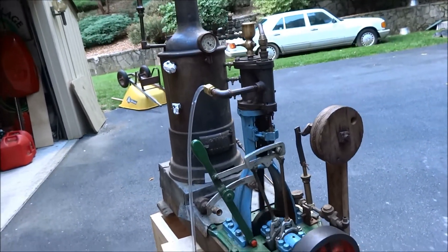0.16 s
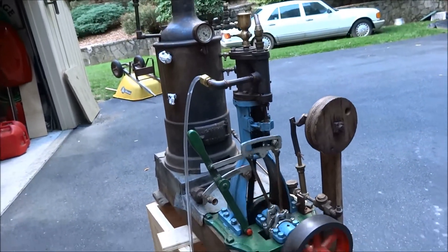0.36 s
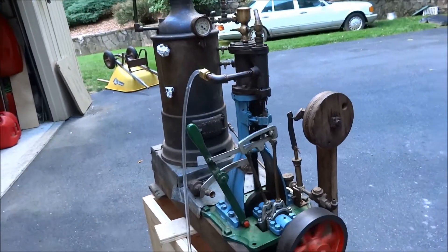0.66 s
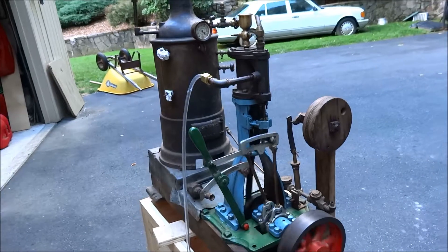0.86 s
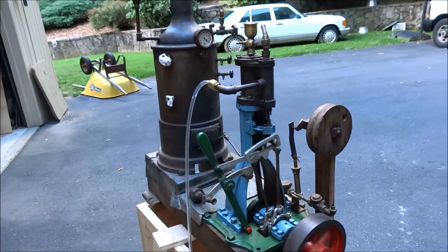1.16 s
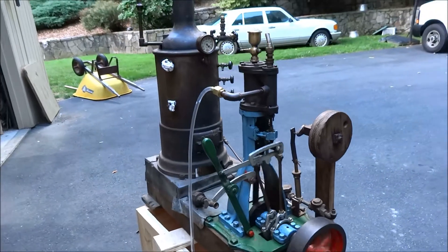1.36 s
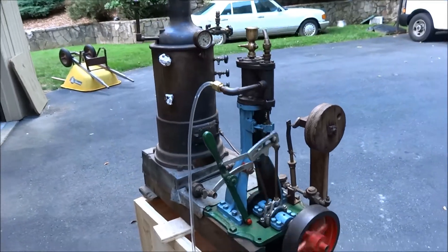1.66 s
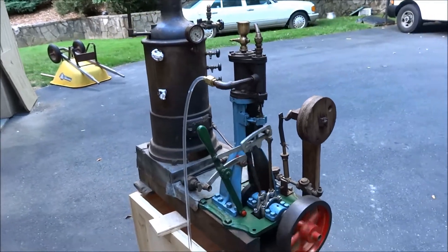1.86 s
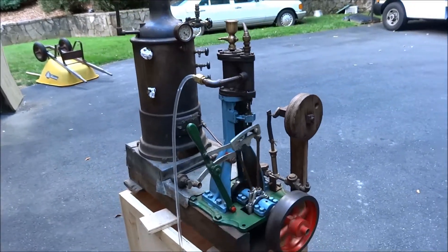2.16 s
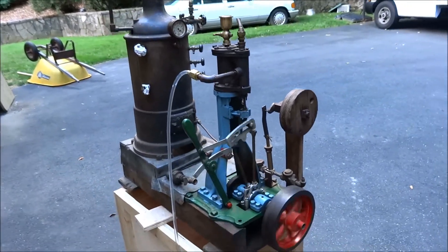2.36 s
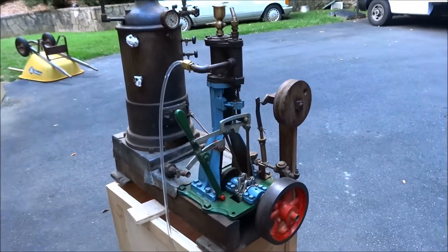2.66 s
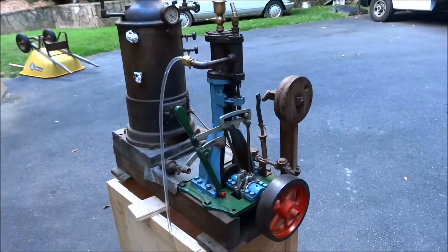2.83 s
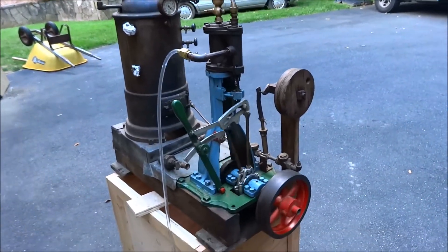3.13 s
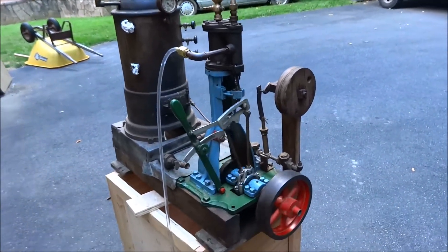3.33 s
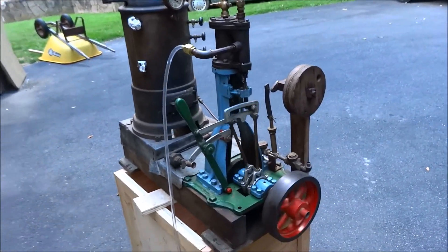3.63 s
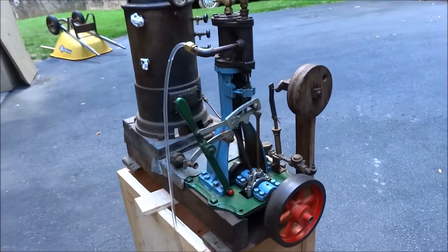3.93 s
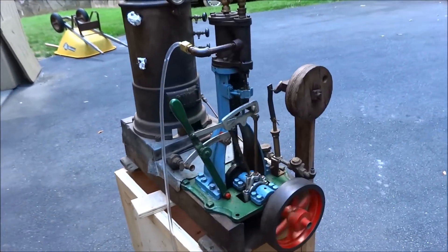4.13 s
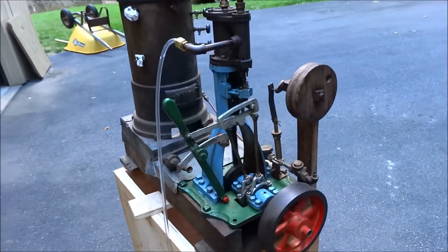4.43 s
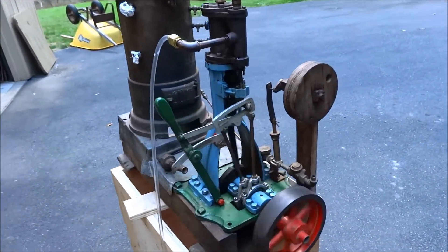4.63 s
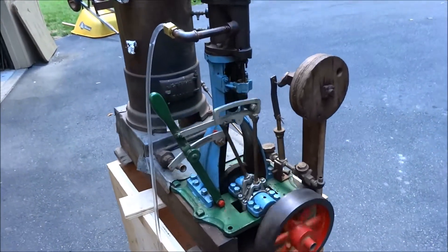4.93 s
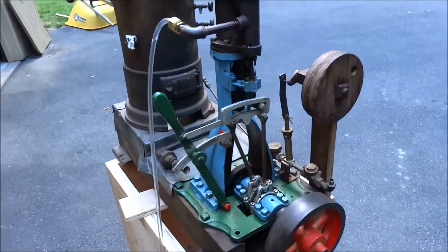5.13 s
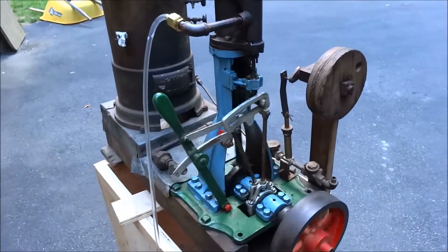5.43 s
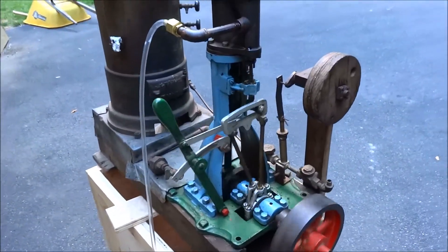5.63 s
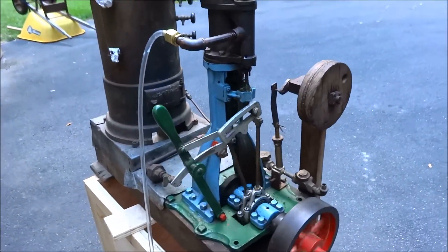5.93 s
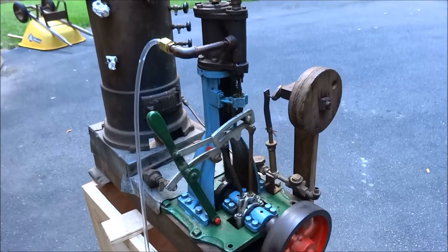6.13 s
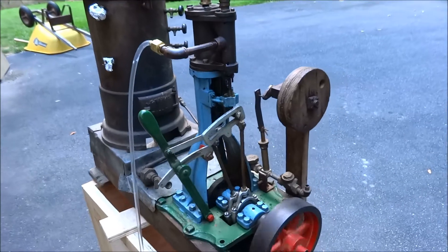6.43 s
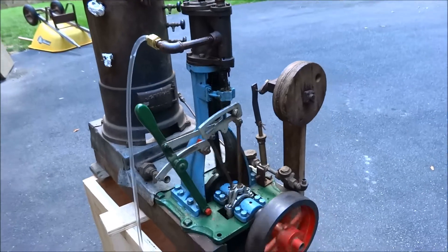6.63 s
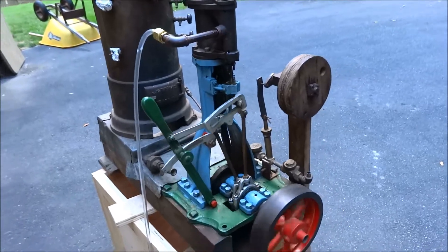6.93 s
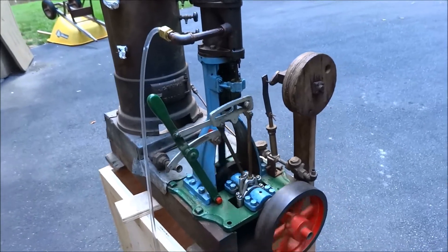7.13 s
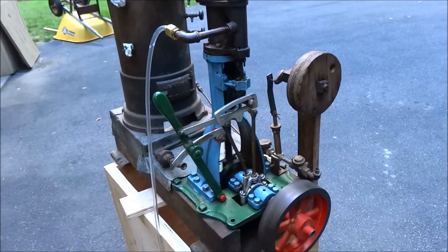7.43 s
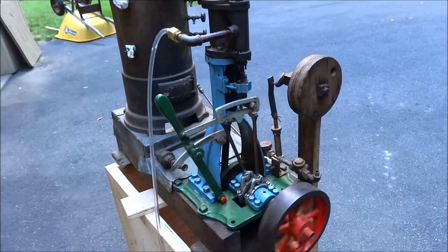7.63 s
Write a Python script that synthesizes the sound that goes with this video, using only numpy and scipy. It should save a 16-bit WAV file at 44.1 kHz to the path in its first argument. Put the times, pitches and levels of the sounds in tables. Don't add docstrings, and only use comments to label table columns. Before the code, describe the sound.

Rapid hissing, whistling exhaust puffs from a small compressed-air engine close by, with light wooden knocks and clatter, gradually slowing outdoors.

```python
import sys
import numpy as np
from scipy import signal
from scipy.fft import rfft, irfft, next_fast_len
from scipy.io import wavfile
from scipy.ndimage import uniform_filter1d

SR = 44100
rng = np.random.default_rng(int(sys.argv[2]) if len(sys.argv) > 2 else 0)


def magnitude_from_level(level_db):
    exponent = np.asarray(level_db, float) / 20
    return 10 ** exponent


def store_wav(level_fs):
    pcm = np.round(np.clip(np.atleast_2d(level_fs), -1, 1) * 32767)
    wavfile.write(sys.argv[1], SR, pcm.T.astype(np.int16))


N = 343098

# (time [s], low modes [dB], middle modes [dB], high modes [dB], hiss brightness [dB])
APPROACH = [(0, -43, -33.5, -25.5, -22), (2.5, -43.5, -32, -25.5, -23), (5, -38, -30, -24.5, -25),
            (7.8, -36.5, -28.5, -26, -28)]
# (time [s], valve progress at which the jet drops out of its fast regime [1])
PRESSURE = [
    (0, 0.66),
    (2, 0.5),
    (3.5, 0.29),
    (5, 0.29),
    (7.8, 0.03),
]


def evened(x):
    return x / np.sqrt(np.mean(x ** 2) + 1e-20)


def follow(course, x, column=1):
    rows = np.transpose(course)
    return np.interp(x, rows[0], rows[column])


def read(points, hz):
    f, value = np.transpose(points)
    return np.interp(np.log(hz + 1), np.log(f + 1), value)


def coloured_noise(points):
    size = next_fast_len(N)
    gain = magnitude_from_level(read(points, np.fft.rfftfreq(size, 1 / SR)))
    return evened(irfft(rfft(rng.standard_normal(N), size) * gain, size)[:N])


def drift(seconds):
    size = max(int(seconds * SR), 1)
    return evened(uniform_filter1d(uniform_filter1d(rng.standard_normal(N), size), size))


def pressure_sag(s):
    return PRESSURE[0][1] - follow(PRESSURE, s)


def turn_times():
    # (turns since the first upstroke [1], time [s])
    flywheel = [(0, -.043), (3, .466), (6, .977), (9, 1.495), (12, 2.019), (15, 2.559), (18, 3.129),
                (21, 3.732), (24, 4.366), (27, 5.007), (30, 5.668), (33, 6.375), (35, 6.886), (36, 7.153),
                (37, 7.433), (38, 7.734), (39, 8.059)]
    turns, s = np.transpose(flywheel)
    k, slope = np.arange(turns[-1] + 1), np.gradient(s, turns, edge_order=2)
    i = np.minimum(np.searchsorted(turns, k, "right"), len(s) - 1) - 1
    span = turns[i + 1] - turns[i]
    u, step = (k - turns[i]) / span, s[i + 1] - s[i]
    a, b = slope[i] * span, slope[i + 1] * span
    return s[i] + u * a + u ** 2 * (3 * step - 2 * a - b) + u ** 3 * (a + b - 2 * step)


def strokes():
    # (time [s], downstroke opens after [turn], upstroke open for [turn], downstroke open for [turn])
    timing = [(0, 0.52, 0.37, .27), (2, 0.52, 0.36, .272), (3.5, 0.52, 0.36, 0.29), (4.7, 0.52, 0.38, 0.31),
              (6, 0.52, 0.37, 0.32), (6.8, 0.53, 0.37, 0.32), (7.8, 0.52, 0.34, 0.32)]
    # (time [s], flow [dB], grip of the jet on the 7 kHz mode [dB])
    jet = [(0, -0.5, -0.5), (.9, -0.5, 0), (1.8, -1.7, -0.5), (3, -0.6, 1.5), (3.4, 2, 2.5), (4.3, .3, 3.5),
           (5.3, 1, 6.5), (6.3, 0.3, 4), (7.8, 2, 0.5)]
    # (hiss [dB], 5 kHz whistle [dB], 7 kHz whistle [dB], afterblow [dB])
    stroke_db = [
        (-23, -33, -23.5, 0.4),
        (-20, -32.5, -24.5, -4.5),
    ]
    # (hiss [dB], 5 kHz [dB], 7 kHz [dB], afterblow [dB])
    sag_rise_db = [
        (3.5, 21.5, 0.1, 0.1),
        (-1, 14.5, 0.1, 10),
    ]
    # (hiss [dB], 5 kHz [dB], 7 kHz [dB], afterblow [dB])
    chance_db = (.5, 1, 1, 1.2)
    # (time [s], afterblow change [dB])
    seatings = [
        (7.3, -9),
        (7.59, -5),
        (1.8, -6),
        (1.24, 6),
        (5.34, 3),
    ]
    up = turn_times()
    period, up = np.diff(up), up[:-1]
    delay, open_up, open_down = (follow(timing, up, column) * period for column in (1, 2, 3))
    opens = np.ravel([up, up + delay], "F")
    span = np.ravel([open_up, open_down], "F")
    down, sag = np.arange(len(opens)) % 2, pressure_sag(opens)
    db = np.array(stroke_db)[down] + np.array(sag_rise_db)[down] * sag[:, None]
    db[:, 0] += follow(jet, opens, 1)
    db[:, 2] += follow(jet, opens, 2)
    db += chance_db * rng.standard_normal(db.shape)
    for s, change_db in seatings:
        db[np.argmin(abs(opens - s)), -1] += change_db
    return np.column_stack([opens, span, db])[opens < N / SR]


def crank(puffs):
    t, (opens, span) = np.arange(N) / SR, puffs.T[:2]
    stroke = np.clip(np.searchsorted(opens, t) - 1, 0, len(opens) - 1)
    rest = np.maximum(np.append(np.diff(opens), 2 * span[-1]) - span, 1e-3)
    since = t - opens[stroke]
    shut = 1 + (since - span[stroke]) / rest[stroke]
    return stroke, np.where(since < span[stroke], since / span[stroke], shut)


def valve_db(puffs, stroke, progress, column):
    # (progress [1], hiss up [dB], hiss down [dB], whistle up [dB], whistle down [dB])
    valve = [
        (0, -1.5, 0.5, 8, 5),
        (.05, 4.5, 1.5, 1, 10),
        (.14, 3.5, 4, -1, 5),
        (.6, 3, 1, -1, 1.5),
        (.97, -3, -9.5, 0, 0),
        (1.07, -9, -15, -3.5, -7.5),
        (1.38, -10.5, -25, -1, -2.5),
        (1.5, -20, -24.5, -7, -4.5),
        (2, -7.5, -24, 0.5, -14.5),
    ]
    # (progress [1], change as pressure sags by 1 [dB])
    seep = [
        (1, 1.5),
        (1.22, -9),
        (1.5, 9),
        (2, -0.5),
    ]
    up, down = follow(valve, progress, column), follow(valve, progress, column + 1)
    shut_steps = np.transpose(valve)[0][4:8]
    afterblow = np.interp(progress, shut_steps, [0, 1, 1, 0]) * puffs[stroke, 5]
    up = up + pressure_sag(puffs[stroke, 0]) * follow(seep, progress)
    return np.where(stroke % 2, down, up) + afterblow


def hiss(puffs, stroke, progress):
    # (frequency [Hz], level per Hz [dB])
    jet_colour = [(700, -30), (1300, -37), (2300, -9.5), (4000, -10.5), (6000, -3.5), (8000, 0),
                  (10500, 5.5), (12500, 4), (15000, -4), (16000, -9)]
    sweep_db, patchy_db, gusty_db = 11, 2.0, 0.6
    frames, hz = N // 64 + 5, np.fft.rfftfreq(256, 1 / SR)
    at = np.minimum(np.arange(frames) * 64, N - 1)
    bright_db = follow(APPROACH, at / SR, 4) + 21
    tilt_db = 1.58 * bright_db + sweep_db * (.55 - np.minimum(progress[at], 1.1))
    tilt_db -= 0.37 * bright_db * np.exp(-progress[at] / 0.12)
    a, b, patches = rng.standard_normal((frames, 129, 3)).T
    patches = evened(uniform_filter1d(uniform_filter1d(patches, size=4, axis=0), size=6, axis=1))
    octaves = np.clip(np.log2((hz + 1) / 8500), -.8, 1)
    field_db = read(jet_colour, hz)[:, None] + octaves[:, None] * tilt_db + patchy_db * patches
    noise = signal.istft((a + 1j * b) * magnitude_from_level(field_db), nperseg=256, noverlap=192)[1][:N]
    level_db = puffs[stroke, 2] + valve_db(puffs, stroke, progress, column=1) + gusty_db * drift(0.0055)
    level_db += 11.0 * (follow(PRESSURE, np.arange(N) / SR) - .45)
    return evened(noise) * uniform_filter1d(magnitude_from_level(level_db + 5.5), size=40)


def resonate(x, hz, width):
    turn = np.exp(2j * np.pi * np.cumsum(hz) / SR)
    r = np.exp(-1.5 * np.pi * width / SR)
    return 2.224 * (turn * signal.lfilter([(1 - r) ** 2], [1, -2 * r, r * r], x / turn)).real


def whistles(puffs, stroke, progress):
    # (frequency [Hz], width [Hz], level [dB], jet excess of best locking [1],
    # reach above [1], reach below [1], locking depth [dB], upward pull [1])
    passage = [(1025, 133, -13, -0.92, .5, 0.51, -3, 0.074),
               (1710, 326, -0.5, 0.21, 0.97, 1.1, -3.5, -0.097), (2990, 270, 3, -0.72, 0.63, 2.2, 7, 0.071),
               (4206, 200, -8, -0.33, 0.83, 0.46, 7.5, 0.12), (4985, 207, .5, -0.4, 0.43, 0.6, 11.5, 0.04),
               (6826, 225, -1, -0.14, 0.31, 0.51, 15.5, 0.202), (8990, 330, 4, 0.18, 0.4, 0.32, 23, 0.19),
               (9560, 180, 3.5, -0.064, 0.097, 0.85, 5.5, -0.123),
               (10770, 300, 6, 0.345, 0.12, 0.078, 29, 0.27),
               (11364, 180, 1, -0.064, 0.17, 0.59, 4.5, 0.0018),
               (11470, 760, 0.5, 0.14, 0.88, .15, 21, 0.59), (13870, 580, 0, 0.046, 0.47, 0.45, 9, 0.21)]
    flicker_db, wander = 1.5, 0.0092
    t = np.arange(N) / SR
    excess = follow(PRESSURE, t) - progress
    low, mid, high = (follow(APPROACH, t, column) for column in (1, 2, 3))
    base_db = [low, low, mid, mid, puffs[stroke, 3], puffs[stroke, 4]] + [high] * 6
    whistle_flow_db = valve_db(puffs, stroke, progress, column=3)
    hiss_flow_db = valve_db(puffs, stroke, progress, column=1)
    is_open, out = progress < 1, np.zeros(N)
    flicker = [drift(0.0084), drift(0.018)]
    for k, (hz, width, db, best, above, below, depth_db, pull) in enumerate(passage):
        off = excess - best
        lock = magnitude_from_level(depth_db * (np.exp(-(off / np.where(off > 0, above, below)) ** 2) - 1))
        if k in (4, 5):
            power = np.bincount(stroke, lock ** 2 * is_open) / np.bincount(stroke, is_open)
            lock /= np.sqrt(power)[stroke]
        loud, bend = (np.roll(f, rng.integers(N)) for f in flicker)
        flow_db = hiss_flow_db if hz > 7500 else whistle_flow_db
        ring_on = min(0.87 + hz / 11000, 1)
        drive = magnitude_from_level(base_db[k] + db + ring_on * flow_db + flicker_db * loud) * lock
        pitch = hz * (1 + pull * np.clip(off, 0, .5) + wander * bend)
        gain = np.sqrt(SR / (np.pi * width))
        out += gain * resonate(drive * rng.standard_normal(N), pitch, width)
    return out


def each_turn(course, opens):
    at = opens + follow(course, opens, 1)
    db = follow(course, opens, 2) + 1.2 * rng.standard_normal(len(at))
    return np.column_stack([at, db])[(at > 0) & (at < N / SR)]


def bursts(rows, spread, colour):
    t, gain = np.arange(N) / SR, np.zeros(N)
    for s, db in rows:
        near = slice(max(round((s - 4 * spread) * SR), 0), round((s + 4 * spread) * SR))
        gain[near] += magnitude_from_level(db) * np.exp(-((t[near] - s) / spread) ** 2)
    return gain * coloured_noise(colour)


def slaps(puffs):
    # (time [s], level [dB])
    face_slaps = [(0.592, -8.8), (1.564, -16.0), (1.734, -18.1), (1.91, -17.1), (2.823, -16.8),
                  (3.01, -20.2), (3.204, -17.4), (5.181, -17.4), (5.849, -14.2), (6.082, -14.4),
                  (7.378, -10.2), (7.675, -9.8)]
    # (time [s], lag after the valve opens [s], level [dB])
    pops = [(0, -0.0051, -41), (3, 0.0045, -33), (5, -0.0018, -27.5), (7.8, -0.000036, -25)]
    # (time [s], lag after the valve opens [s], level [dB])
    spits = [(0, -0.018, -48), (2.5, -0.014, -38), (5, -0.014, -21), (6.9, -0.0184, -21), (7.3, -.022, -42)]
    # (frequency [Hz], level per Hz [dB])
    pop_colour = [(400, -30), (800, -6.5), (1700, -3), (3000, -2.5), (8000, -20)]
    # (frequency [Hz], level per Hz [dB])
    spit_colour = [(1800, -18), (2600, -11), (3030, -10), (3600, -24), (4500, -22), (5000, 3), (5600, -13),
                   (9600, -22)]
    out = bursts(face_slaps, 0.0025, [(2500, -18), (6000, 2), (11000, 3), (16000, -12)])
    out += bursts(each_turn(pops, puffs[:, 0]), 0.0023, pop_colour)
    return out + bursts(each_turn(spits, puffs[::2, 0]), 0.0035, spit_colour)


def blows(rows, hz, rise, fall, db, scatter=0., glide=0., overtones=()):
    out, t = np.zeros(N + SR), np.arange(5000) / SR
    detunes = rng.uniform(-1.3, 1, len(rows))
    for (s, peak_db), detune in zip(rows, detunes):
        swell = np.sin(np.pi / 2 * np.minimum(t / rise, 1))
        swell *= np.exp(-(np.maximum(t - rise, 0) / fall) ** 2)
        ring = swell * np.sin(2 * np.pi * hz * t * (1 + scatter * detune + glide * t))
        for h, d, f in overtones:
            ring += magnitude_from_level(d) * np.exp(-t / f) * np.sin(2 * np.pi * h * (1 + 0.1 * detune) * t)
        start = max(round((s - rise) * SR), 0)
        out[start:start + len(t)] += magnitude_from_level(peak_db + db) * ring
    return out[:N]


def clatter(puffs):
    # (time [s], lag after the valve opens [s], level [dB]) Crank load on the stand, and the stand
    thump_course = [(0, 0.044, -36), (1.8, .044, -36), (2.1, 0.0368, -33.5), (2.8, 0.036, -31),
                    (3, 0.042, -31), (4, .043, -34.5), (5.1, .049, -34.5), (6, 0.042, -37.5),
                    (7.2, 0.049, -43)]
    settle_course = [(0, 0.079, -60), (3, 0.093, -49), (4.5, 0.104, -41), (5.5, .108, -43),
                     (6.2, 0.108, -50), (7.8, .12, -56)]
    knock_up = [(0, -0.0045, -34.5), (2.4, -0.0036, -32), (3.3, -.005, -30.5), (3.7, -0.0043, -35),
                (4.4, -.012, -36.5), (4.8, -0.01, -31.5), (5.9, -.011, -26.5), (6.9, -0.0075, -28.5),
                (7.8, -.01, -35)]
    knock_down = [(0, -0.018, -32.5), (.8, -0.013, -30), (1.3, -0.0098, -35.5), (3.4, -.015, -36),
                  (4.2, -0.018, -40), (4.7, -.017, -32), (5.5, -.019, -33), (6, -0.008, -27.5),
                  (7.8, -0.031, -29.5)]
    chirp_course = [(.46, 0.00068, -39), (.6, -.03, -43), (1.7, -0.025, -36.5), (2.9, -.034, -32.5),
                    (3.7, -.026, -33.5), (4.2, -.035, -36), (4.8, -.04, -36), (7.1, -0.036, -36),
                    (7.4, -0.083, -38)]
    rub_course = [(0, -0.066, -51), (2, -0.069, -39), (4, -.062, -37), (7.8, -.08, -45)]
    rock_back = [(0, -.015, -38), (1.7, -.011, -39), (2.2, -.006, -38.5), (3.5, -0.011, -38),
                 (3.7, -0.03, -35), (5.6, -0.0328, -45), (5.9, -.018, -39), (7.15, -0.018, -31),
                 (7.4, -0.054, -26.5)]
    rock_forward = [(0, -.014, -48), (3, -0.0173, -41), (7.8, -.022, -46)]
    up, down = puffs[::2, 0], puffs[1::2, 0]
    thumps = blows(each_turn(thump_course, up), 91.6, 0.018, 0.034, 4.4, scatter=0.018,
                   overtones=[(288.6, -6.5, 0.026), (175, -6.5, 0.017)])
    thumps += blows(each_turn(settle_course, up), 90.3, 0.0302, 0.042, 2.7)
    ends = np.vstack([each_turn(knock_up, up), each_turn(knock_down, down)])
    knocks = blows(ends, 310.4, 0.00692, 0.0084, 0.3, scatter=0.063,
                   overtones=[(382, -2.5, 0.0086), (236, -6, 0.017)])
    rubs = np.vstack([each_turn(chirp_course, up), each_turn(rub_course, up)])
    chirps = blows(rubs, 763, .012, 0.017, -3.0, scatter=0.031, glide=3.44)
    chirps *= 1 + 0.5 * drift(0.0026)
    rocks = np.vstack([each_turn(rock_back, up), each_turn(rock_forward, down)])
    return thumps + knocks + chirps + blows(rocks, 154.5, 0.01016, 0.0094, 1.4, scatter=0.088)


def yard(stroke, progress):
    # (frequency [Hz], level per Hz [dB])
    leak_colour = [(1300, -4.5), (2500, 0), (5000, -7.5), (8000, 5), (14300, 2), (15700, -5), (16200, -13)]
    # (frequency [Hz], level per Hz [dB])
    rumble_colour = [(15, -50), (25, -9), (87, -3.5), (113, -0.5), (224, -6), (300, 0), (519, -10),
                     (730, -5), (1140, -12.5), (1500, -14), (1950, -31), (3300, -120)]
    # (time [s], level [dB])
    rumble_course = [(0, -42.5), (2.5, -40.5), (5, -39), (7.8, -38)]
    level_db = follow(rumble_course, np.arange(N) / SR) + 1.76 * drift(0.028)
    level_db += -6 * (stroke % 2 == 0) * np.exp(-((progress - .18) / .11) ** 2)
    leak = magnitude_from_level(-33.5 + 3.2 * drift(0.013)) * coloured_noise([(600, -45)] + leak_colour)
    return leak + magnitude_from_level(level_db) * coloured_noise(rumble_colour)


def scene():
    puffs = strokes()
    stroke, progress = crank(puffs)
    jet = hiss(puffs, stroke, progress) + whistles(puffs, stroke, progress)
    mid = jet + slaps(puffs) + clatter(puffs) + yard(stroke, progress)
    return np.array([mid, mid])


def split(mid):
    width, loud_db, chance_db, difference_db = 12, 6.2, 2.4, -16
    z = signal.stft(mid, nperseg=2048, noverlap=1024)[2]
    cells = np.arange(len(z)) // round(2 * width)
    power = np.array([np.bincount(cells, abs(c) ** 2) for c in z.T]).T
    level_db = 10 * np.log10(power + 1e-20)
    around_db = uniform_filter1d(uniform_filter1d(level_db, size=5, axis=0), size=3, axis=1)
    chance = chance_db * rng.standard_normal(level_db.shape[::-1]).T
    parted = 1 / (1 + np.exp(-4 * (level_db - around_db + chance - loud_db)))
    parted[0], parted[28:] = parted[0] * .55, 0
    turn = np.exp(2j * np.pi * rng.random(z.shape[::-1]).T)
    parts = z * turn * parted[cells] ** 4 * magnitude_from_level(difference_db)
    side = signal.istft(parts, nperseg=2048, noverlap=1024)[1][:N]
    return np.array([mid + side, mid - side])


def roll_off(x):
    return signal.sosfilt(signal.butter(12, 16480, fs=SR, output="sos"), x)


def record(dry):
    thin = signal.sosfilt(signal.butter(2, 75, "high", fs=SR, output="sos"), dry)
    held = 1.287 * np.tanh(thin / 1.31)
    band_limit = signal.firwin(1023, 15770, window=("kaiser", 9), fs=SR)
    narrow = signal.oaconvolve(held, band_limit[None], "same")
    return roll_off(split(narrow[0]))


dry = scene()
out = record(dry)
store_wav(out)
```